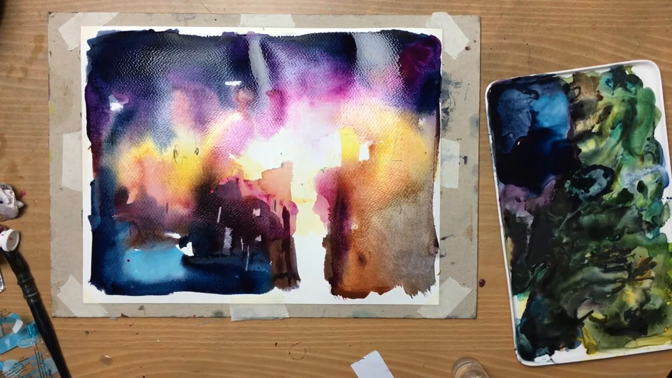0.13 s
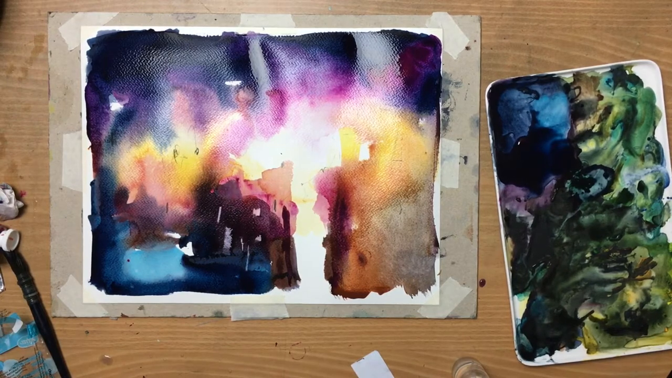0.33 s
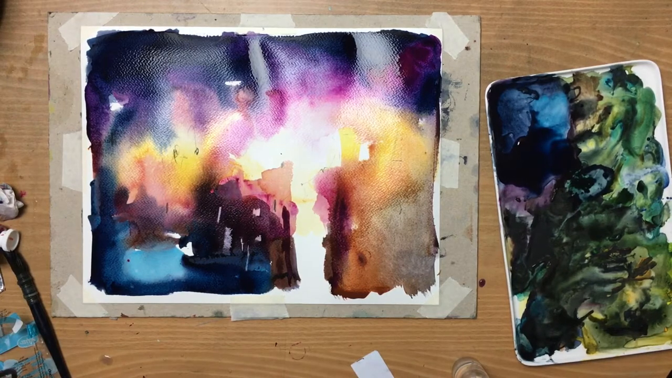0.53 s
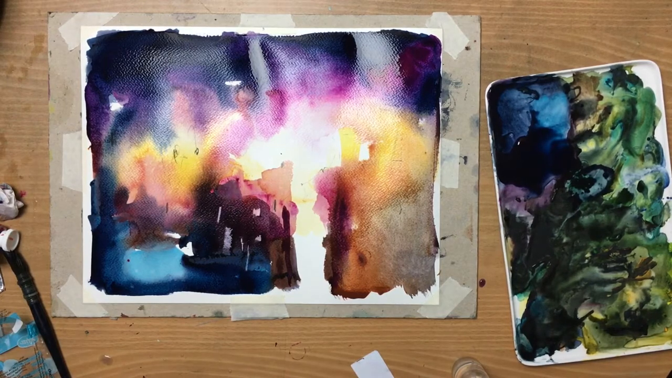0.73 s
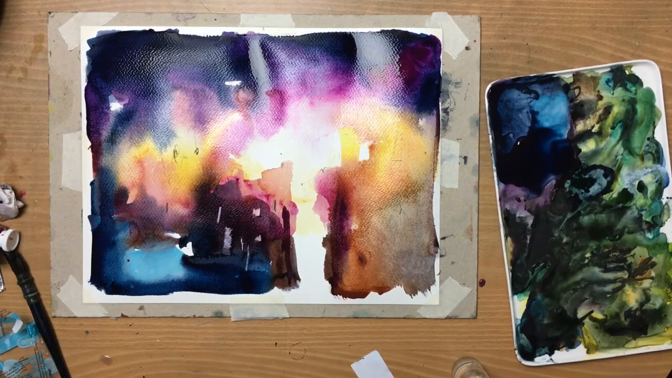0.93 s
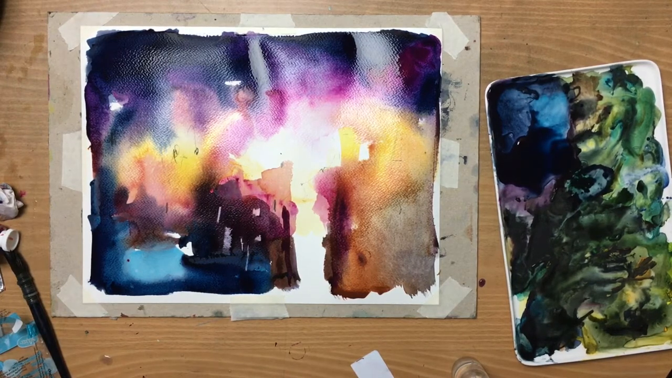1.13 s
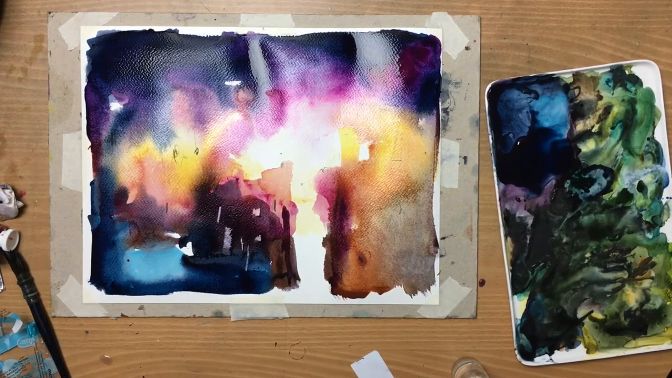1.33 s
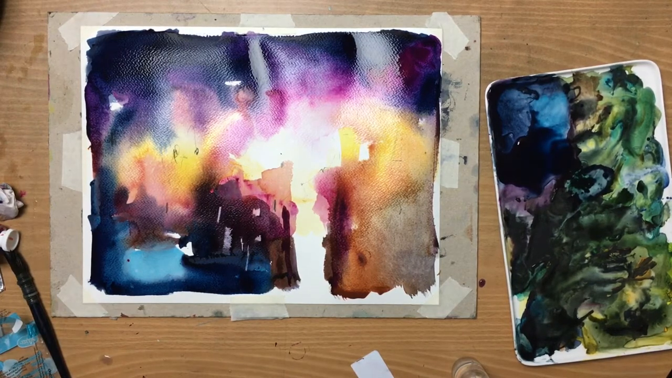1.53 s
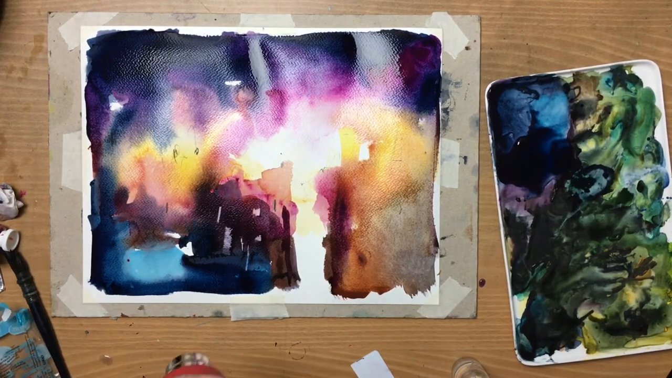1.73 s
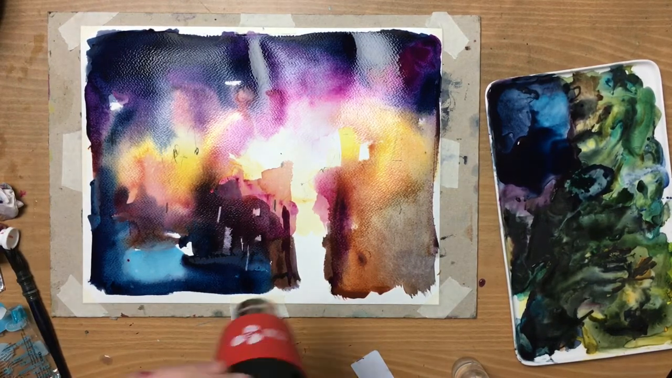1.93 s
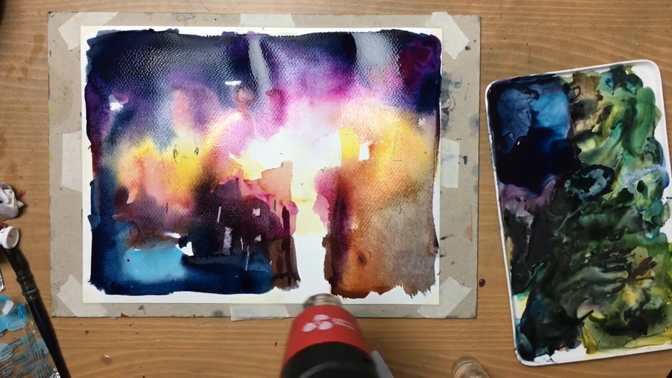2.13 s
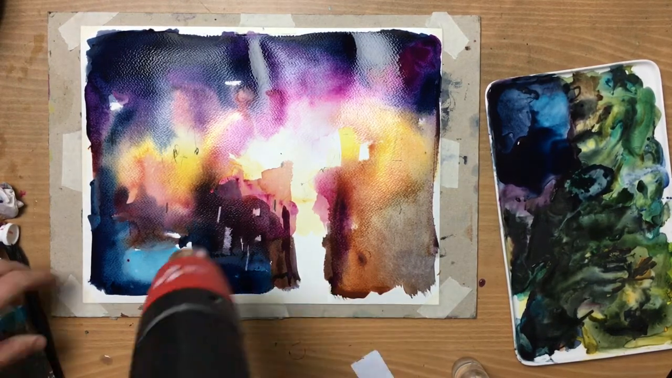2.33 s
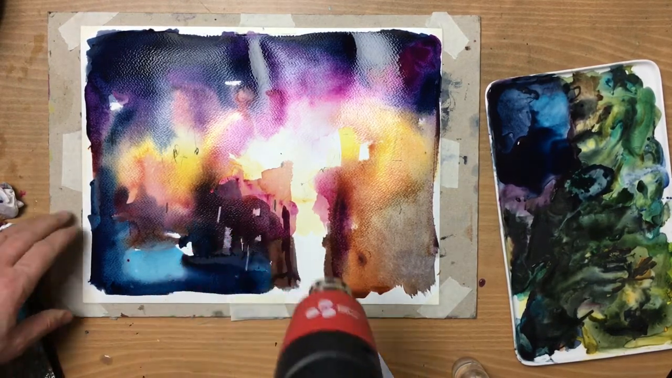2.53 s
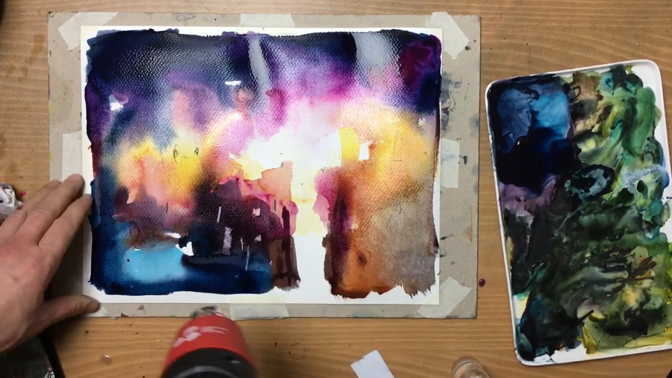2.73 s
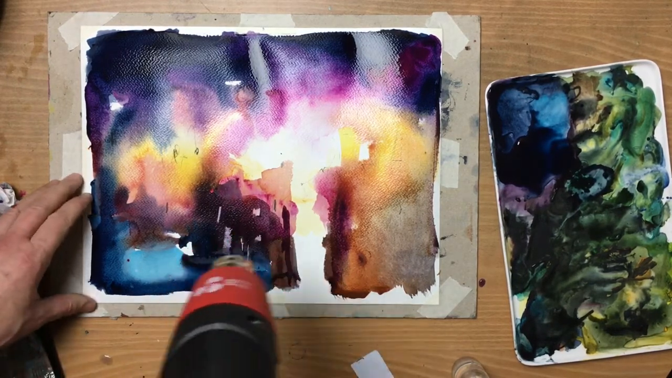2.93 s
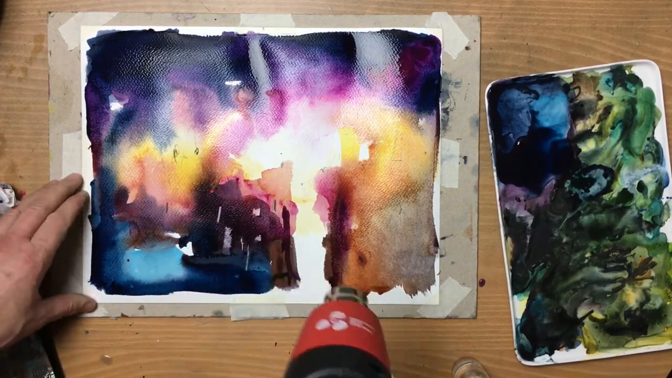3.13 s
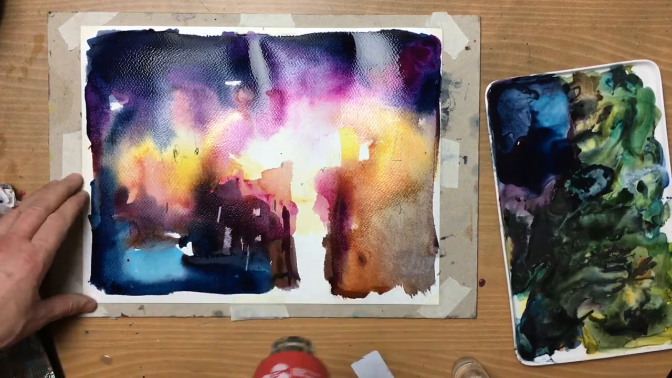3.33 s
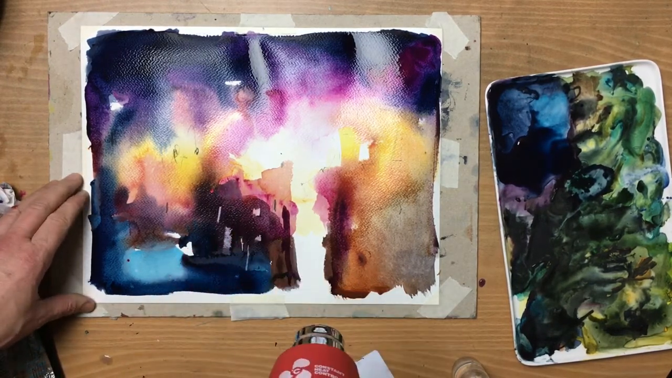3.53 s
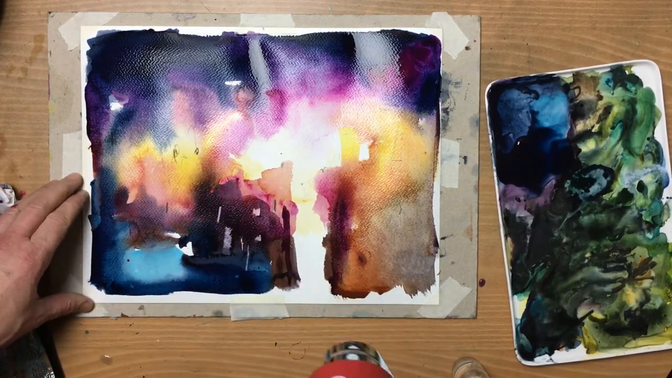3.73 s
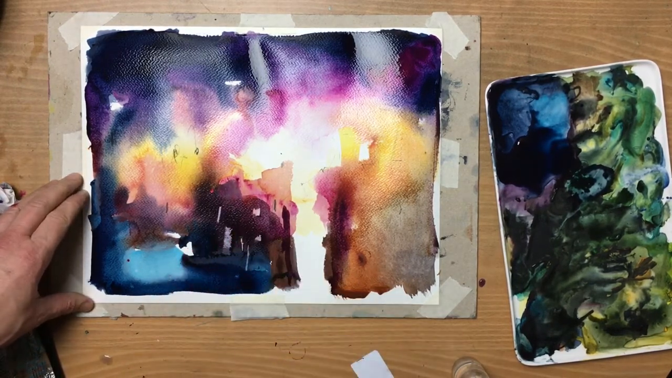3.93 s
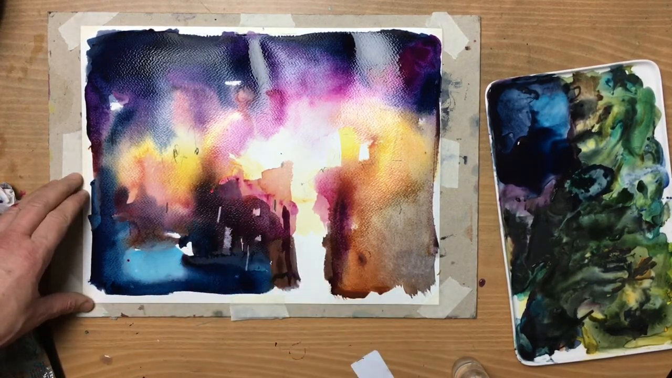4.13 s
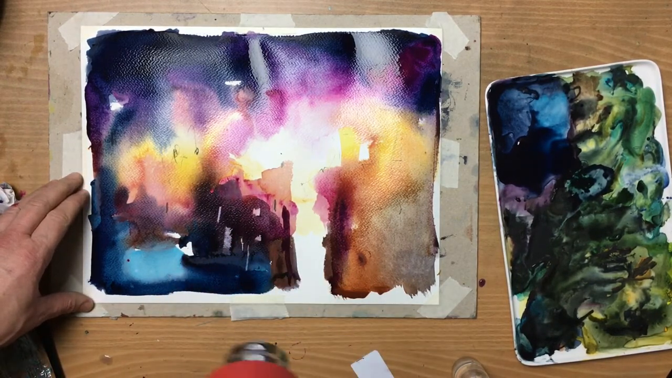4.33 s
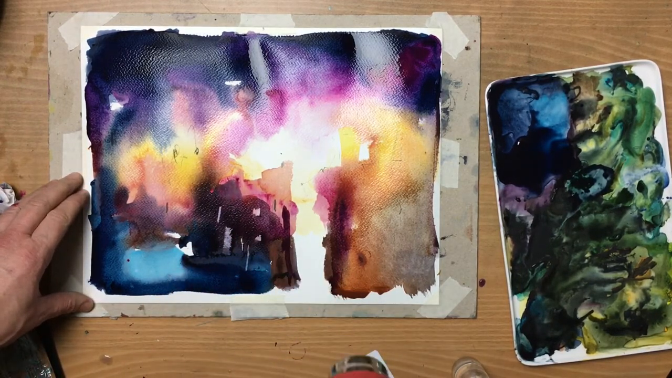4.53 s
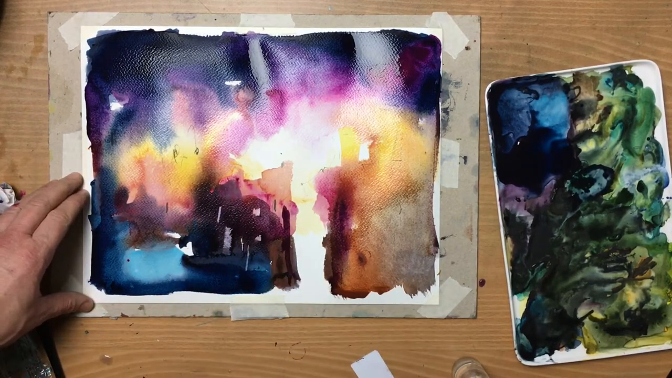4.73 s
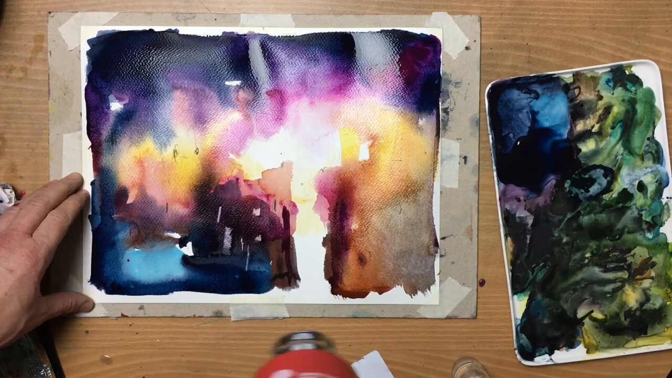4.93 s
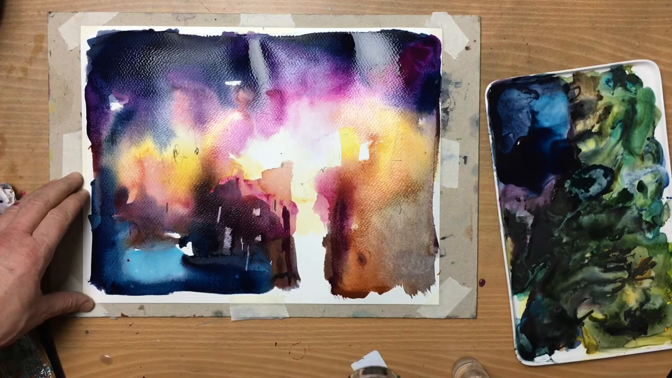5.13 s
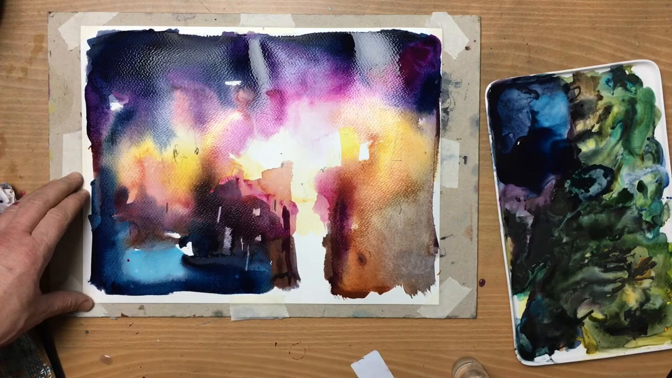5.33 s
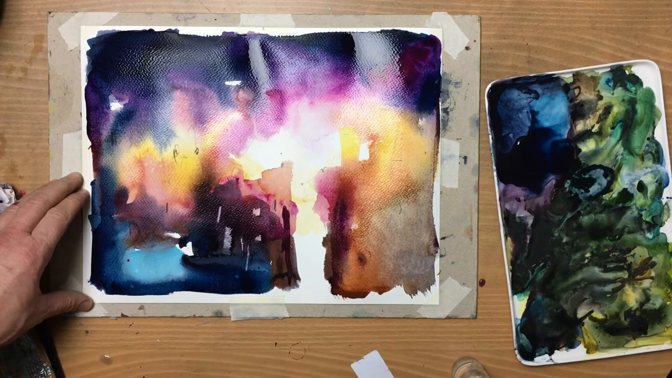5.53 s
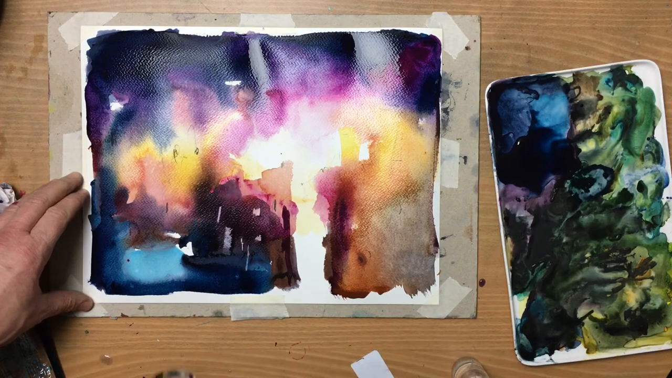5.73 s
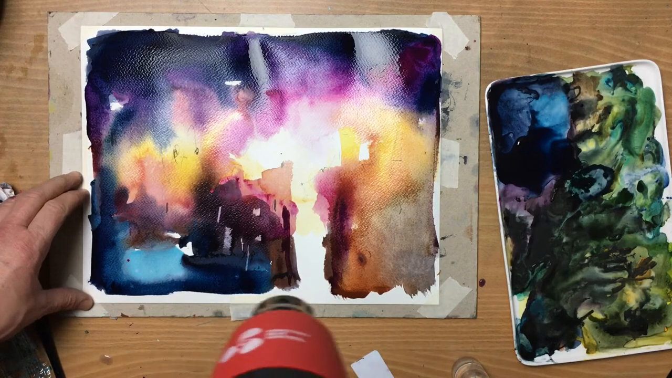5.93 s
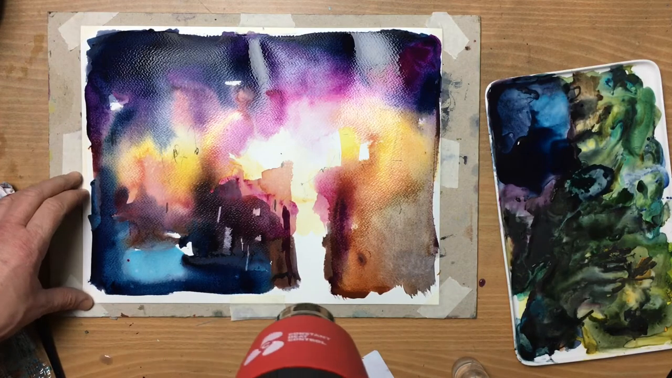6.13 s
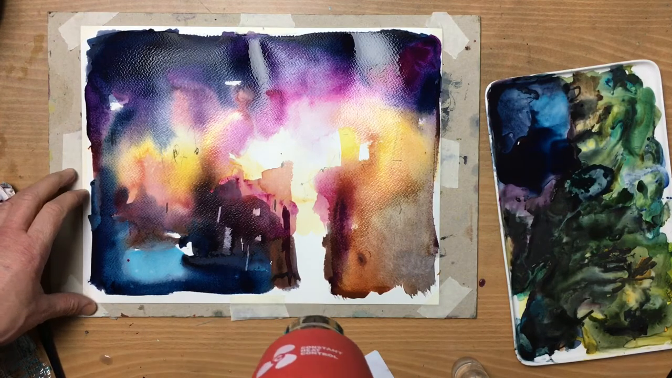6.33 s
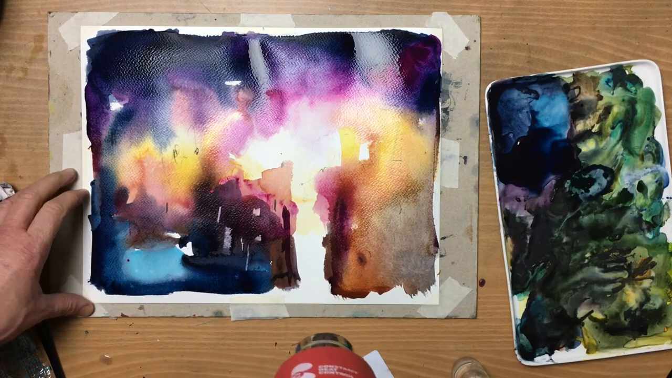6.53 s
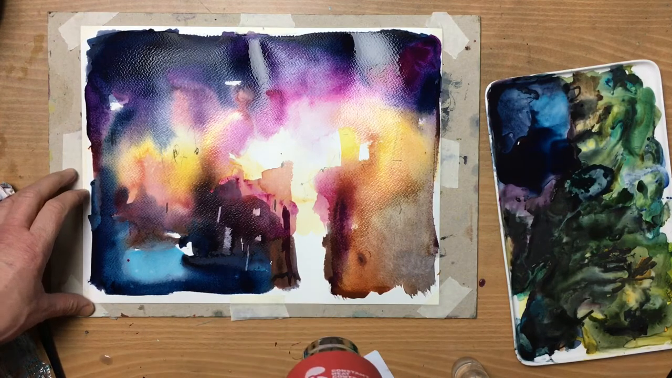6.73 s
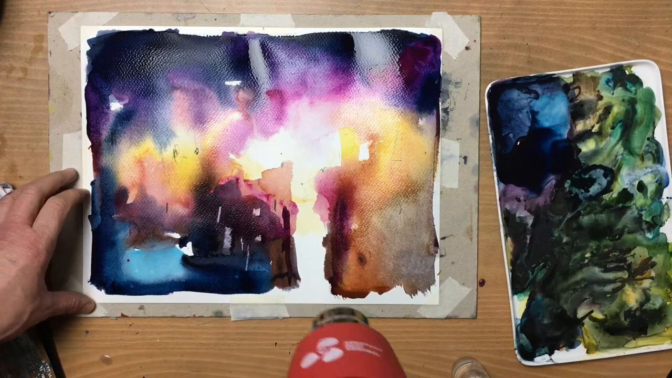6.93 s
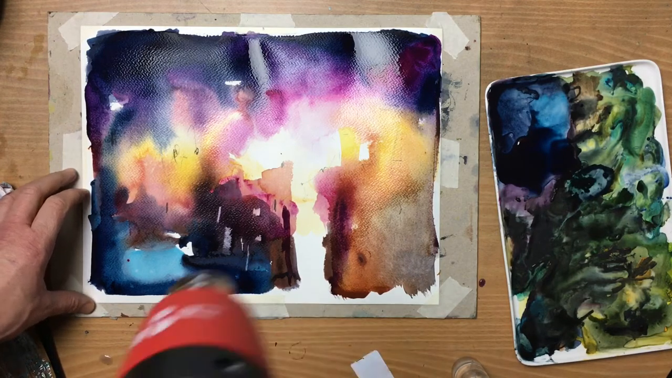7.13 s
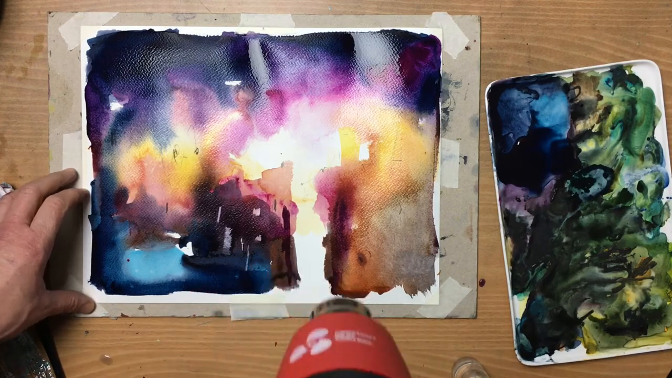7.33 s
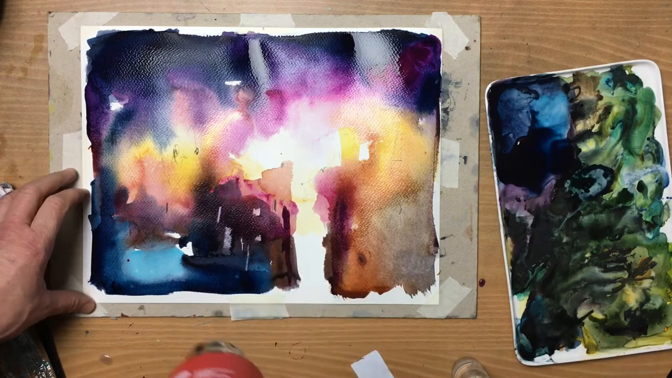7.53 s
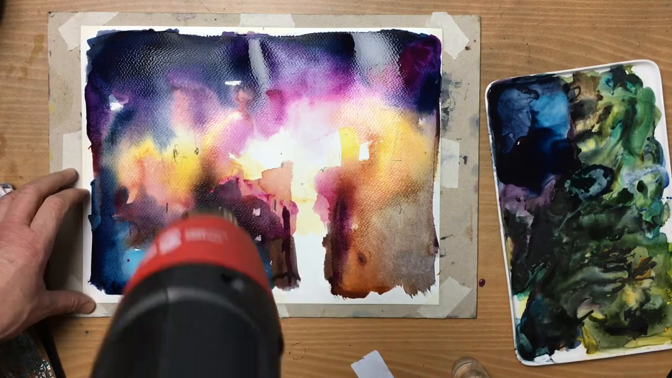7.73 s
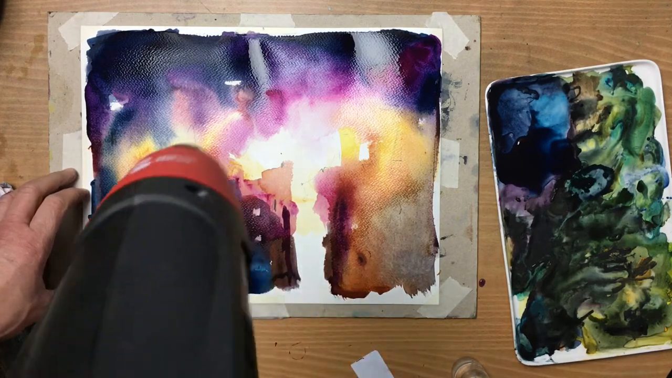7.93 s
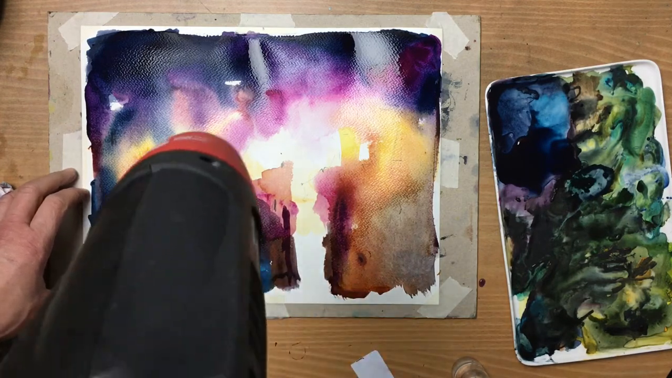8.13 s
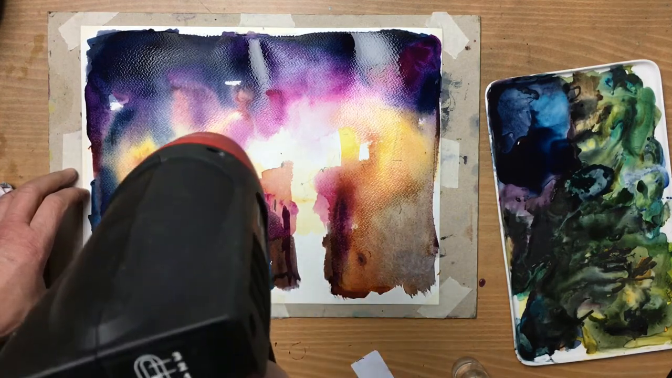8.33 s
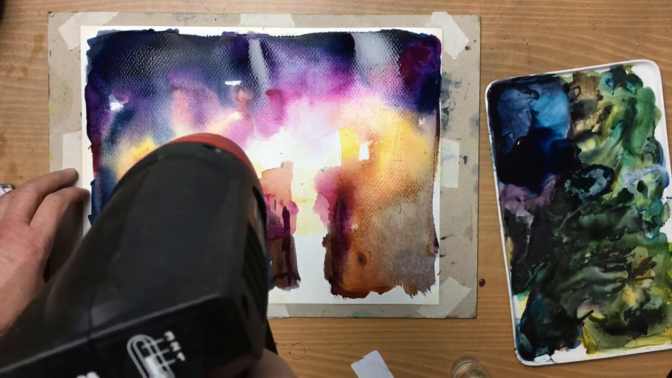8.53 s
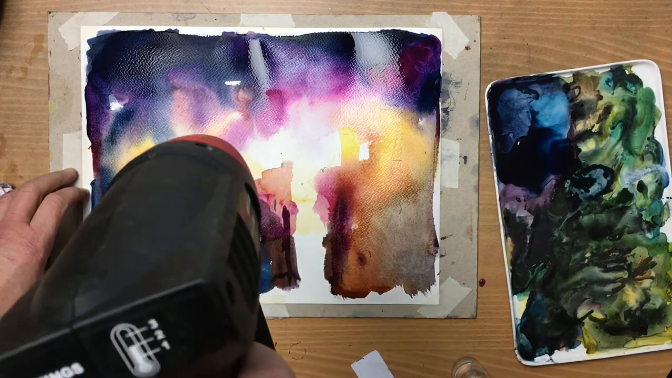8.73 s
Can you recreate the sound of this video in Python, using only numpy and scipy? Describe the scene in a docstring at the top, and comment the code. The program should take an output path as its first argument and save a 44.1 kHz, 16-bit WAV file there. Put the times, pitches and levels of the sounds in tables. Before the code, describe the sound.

Soft knocks and scuffs on a wooden desk, a sharp plastic switch snap, then a hot-air gun whines up into steady, bright rushing air.

```python
"""A hot-air gun is picked up at a wooden desk: knocks ring over clatter, filtered hiss slides, a squeak chirps.
Its plastic switch snaps at about 1.7 s, and the motor spins up: sines whine on multiples of the shaft speed
while the brushes scrape, fizz and buzz. Noise through the resonances of the barrel becomes rushing air, which
changes colour as the hand sweeps it over a watercolour; near 7.5 s the tool is lifted and the hiss brightens.
A faint room noise, hum and hiss lie underneath throughout, close to one microphone."""
import sys
import numpy as np
from scipy import signal
from scipy.fft import rfft, irfft
from scipy.io import wavfile
from scipy.ndimage import map_coordinates

SR = 44100
rng = np.random.default_rng(int(sys.argv[2]) if len(sys.argv) > 2 else 0)


def store_wav(level_fs):
    """Save 16-bit WAV to argv[1]."""
    pcm = np.round(np.clip(np.atleast_2d(level_fs), -1, 1) * 32767)
    wavfile.write(sys.argv[1], SR, pcm.T.astype(np.int16))


N = 391166
T = np.arange(N) / SR

# Resonances the air excites, balanced within each part: f/Hz, width/Hz, level/dB
HOUSING = [(139, 94, -27), (224.4, 22.2, -6), (328, 120, -17), (549, 116, -5), (816, 1500, -14),
           (1315, 307, -2), (1440, 430, -5.5), (1900, 1200, -9)]
BARREL = [(2278, 310, 0), (2575, 670, -6.5)]
GRILLE = [(3510, 770, 1.5), (3900, 590, 6), (4700, 2100, -1), (5860, 950, 1.5), (7425, 900, 2),
          (8540, 1850, -5.5), (10450, 660, -10), (11440, 1940, -8), (13800, 4200, -11.5)]
# Barrel note as the nozzle tilts and nears the paper: t/s, level/dB before a trim, share of usual frequency
BARREL_NOTE = [(1.9, 0.5, 1.06), (2.32, 2.5, 0.91), (2.55, 9, 1), (2.87, 4, 1.03), (3.03, 6.5, 1.04),
               (3.75, 9, 1.003), (4.15, 8.5, 0.96), (5.5, 9, 0.95), (8.3, 8.5, 0.96)]
# Bands of the rush that swell or sink as the nozzle swings: start t/s, length/s, from f/Hz, to f/Hz, level/dB
SWEEPS = [(1.7, 2.2, 760, 770, 5), (2.08, .6, 7900, 8450, 7.5), (2.45, 1.2, 3350, 3400, -6),
          (2.8, 1.25, 2420, 2080, 4), (3.15, .7, 9200, 7600, 5.5), (3.35, .55, 3100, 2400, -9),
          (3.35, .35, 4000, 3500, 4.5), (7.05, .5, 2900, 2850, -6), (7.1, .4, 3450, 3500, 5),
          (7.68, .5, 3700, 3800, 4.5), (7.62, .8, 5000, 5600, 7), (7.76, .45, 8300, 9600, 7.5),
          (7.95, 1.5, 2750, 2750, -4.5), (8.05, 1.3, 13500, 13700, 6.5)]
# Echo lag, set by the tool's height over the desk: t/s, lag/ms
ECHO_LAG = [(2.1, 0.59), (3.2, 0.56), (4.0, 0.73), (4.9, 0.7), (5.7, 0.745), (6.1, 0.79), (6.7, 0.73),
            (7.5, 0.69), (7.82, 0.58), (8.2, 0.53)]
# Echoes off the desk and the things on it: multiple of the desk's lag, share of the direct sound
ECHOES = [(1, .24), (1.5, .15), (2.15, .1)]
# Steady tones at full speed: shaft order, level/dB, change when lifted/dB
STEADY_TONES = [(2, -46.5, -1.5), (3, -47.5, -9), (4, -48, -3), (6, -43.5, 7.5), (9, -50.5, -1),
                (11, -54, 7), (19, -56, 2), (24, -63, 11)]
# Tones on orders 5, 7, 12 and 20 that swell and fade as the tool turns: t/s, level/dB at full speed
FAN_WHINE = [(2.4, -48), (3.15, -43), (4.15, -52), (4.55, -40.5), (5.9, -44.5), (6.9, -39.5), (8.2, -48.5)]
LOW_WHINE = [(1.97, -52), (2.15, -40), (2.7, -35.5), (3.05, -41), (3.4, -51), (3.85, -38.5), (4.15, -42.5),
             (7.4, -42), (8.35, -48), (8.6, -48)]
BLADE_WHINE = [(1.87, -44), (2.15, -38), (2.75, -38), (4.75, -46), (5.05, -37), (5.5, -58), (5.95, -42),
               (6.45, -44), (6.8, -50), (7.2, -47), (7.7, -37.5), (7.9, -37.5), (8.7, -35)]
TOP_WHINE = [(2.4, -57), (3, -51), (3.75, -55), (4.25, -40.5), (4.7, -59), (5.15, -57), (5.4, -52),
             (6.05, -43.5), (6.5, -57), (6.75, -70), (7.15, -50), (7.95, -45), (8.8, -54)]
# Dropouts of orders 7, 12 and 20 as the tool moves through their standing waves: t/s
LOW_DROPOUTS = [2.29, 4.04, 5.83]
BLADE_DROPOUTS = [2.58, 2.96, 3.87, 4.33, 4.84, 5.19, 7.76, 8.04]
TOP_DROPOUTS = [3.15, 3.88, 4.2, 4.56, 5.24, 7.46, 8.15, 8.48]
# Colour of the brushes' treble fizz: f/Hz, level/dB
FIZZ_COLOUR = [(9500, -27), (12800, 0), (15000, -11)]
# The switch is touched, snaps over and bounces: t/s, level/dB, t60/s
CLICKS = [(1.539, -36.5, 0.033), (1.672, -38, 0.008), (1.6907, -16, 0.013), (1.696, -21, 0.012),
          (1.724, -17, 0.014), (1.729, -28, 0.029), (1.740, -22, 0.022), (1.744, -30, 0.018),
          (1.777, -39, 0.032)]
# Colour of the plastic switch, also of the brush scrape: f/Hz, level/dB
PLASTIC_COLOUR = [(650, -36), (1200, -3.5), (4500, -2.5), (6000, 1.5), (10000, -3), (15000, -3.5)]
# Knocks on desk and tool: t/s, level/dB, ring f/Hz, ring t60/s, clatter level/dB against the ring
KNOCKS = [(0.089, -45, 255, 0.067, -20), (.207, -38.5, 650, 0.04, -7), (.217, -44.5, 1323, 0.1, -20),
          (0.218, -45, 2770, 0.066, -25), (0.282, -41.5, 683, 0.072, -4.5), (0.335, -31, 811, 0.078, -14.5),
          (.358, -37.5, 875, 0.09, -6), (0.38, -45, 870, 0.043, -6), (0.467, -43.5, 260, 0.068, -7),
          (.502, -39, 202, 0.13, -16), (.701, -45, 585, 0.091, -6.5), (1.333, -44.5, 550, 0.091, 2),
          (1.366, -55, 890, 0.05, 3.5)]
# Partials of a knock: multiple of its ring frequency, level/dB
RING = [(0.999, 2), (1.1, -18), (2.7, -16)]
# Colour of the knocks' clatter: f/Hz, level/dB
CLATTER_COLOUR = [(30, -35), (130, 7), (600, 3.5), (1300, -1), (3500, -6), (5000, -11.5), (15000, -30)]
# Tool and cord slide over the desk: start t/s, length/s, level/dB before the grain, strongest f/Hz
SLIDES = [(-0.08, 0.24, -57, 3500), (.3, 0.22, -57, 3200), (0.974, 0.25, -60, 2200),
          (1.206, 0.125, -56.5, 11000), (1.641, 0.049, -58, 7000)]
# The arms bump the desk: t/s, level/dB
BUMPS = [(0, -49), (.12, -48.5), (.21, -49), (.36, -48), (.49, -51), (1.47, -58), (1.8, -58.5), (2.39, -57)]
# Colour of the desk rumble: f/Hz, level/dB
RUMBLE_COLOUR = [(45, -51), (90, 8.5), (170, 2), (350, -14), (3000, -91)]
# Colour of the quiet room: f/Hz, level/dB
ROOM_COLOUR = [(48, -41), (95, -2), (130, -9), (350, -16), (650, -11.5), (1500, -14.5), (5000, -20),
               (15000, -48)]

# The motor runs up exponentially once the contacts close, then creeps faster as it warms
ON_S, SHAFT_HZ, RUN_UP_S, CREEP_HZ_PER_S = 1.742, 607.4, 0.322, 1.02
# Growth with speed: gain is the speed share to these powers
RUSH_POWER, BEAM_POWER, TONE_POWER = 1.45, 1.6, 3.9
# The rush starts a little weaker and builds as the tool is brought over the paper
RUSH_DB, APPROACH_DB, APPROACH_END_S = -36, -2, 6
# Lifting the tool raises the hiss around one band and changes the steady tones
LIFT_S, LIFT_LENGTH_S, LIFT_HISS_DB, LIFT_HZ, LIFT_WIDTH_HZ = 7.52, 0.66, 2.5, 6000, 2600
SWEEP_WIDTH_HZ, SWEEP_WIDTH_SHARE = 120, 0.024  # fixed width plus a share of the centre
ECHO_DAMP_HZ = 10100  # rough surfaces take the treble off the echoes
DROPOUT_S = 0.058
SLIDE_BASS_DB, SLIDE_TOP_DB = -9, -10  # skirts of the sliding hiss
SQUEAK_S, SQUEAK_LENGTH_S, SQUEAK_DB = 0.216, 0.022, -49.5
SQUEAK_HZ, SQUEAK_SAG_HZ_PER_S = 3000, 54000
ROOM_DB, HUM_HZ, HUM_DB, HISS_DB = -62.5, 232, -66.5, -68.5
TOP_HZ = 15800


def air(barrel_db, hiss_db, dull_db_per_octave, flutter_db):
    """Turbulence rings housing, barrel and grille, louder and brighter with speed; near echoes comb it."""
    frames = dict(nperseg=2048, noverlap=1536)
    hz, s, eddies = signal.stft(rng.standard_normal(N), SR, **frames)
    hz = hz[:, None] + 1  # keeps clear of 0 Hz
    approach_db = APPROACH_DB * (1 - ramp(s, ON_S, APPROACH_END_S - ON_S))
    rush = undb(RUSH_DB + approach_db) * speed(s) ** RUSH_POWER

    note_db, tuning = read(BARREL_NOTE, s)
    barrel_modes = [(f * tuning, width, db) for f, width, db in BARREL]
    lift_db = LIFT_HISS_DB * ramp(s, LIFT_S, LIFT_LENGTH_S) * resonance(hz, LIFT_HZ, LIFT_WIDTH_HZ)
    dull_db = dull_db_per_octave * (1 - speed(s)) * np.log2(hz / 4000)
    grille_db = hiss_db + lift_db - dull_db
    parts = [(HOUSING, 0), (barrel_modes, note_db + barrel_db), (GRILLE, grille_db)]
    power = 0
    for modes, part_db in parts:
        shape = sum(undb(db) ** 2 * resonance(hz, f, width) for f, width, db in modes)
        power = power + shape / shape.mean() * undb(part_db) ** 2

    lag_s = read(ECHO_LAG, s)[0] / 1000
    echoes = sum(share * np.exp(-2j * np.pi * hz * lag_s * multiple) for multiple, share in ECHOES)
    comb = np.abs(1 + echoes / (1 + (hz / ECHO_DAMP_HZ) ** 2))
    coloured = eddies * rush * np.sqrt(power) * comb * undb(sweeps(hz, s))
    stream = signal.istft(coloured, SR, **frames)[1][:N]
    return stream * undb(flutter_db * walk(24, T))


def sweeps(hz, s):
    """Gain in dB of the narrow bands that swell or sink while they glide."""
    out = 0
    for start, length, from_hz, to_hz, db in SWEEPS:
        along = ramp(s, start, length)
        centre = from_hz + (to_hz - from_hz) * along
        width = SWEEP_WIDTH_HZ + SWEEP_WIDTH_SHARE * centre
        out = out + db * np.sin(np.pi * along) * np.exp(-((hz - centre) / width) ** 2)
    return out


def treble_ripple(x, share=0.16, drift_ms=0.088, above_hz=2200, count=6):
    """Randomly drifting short delays, mixed in above a highpass, give the rush a fine, wandering ripple."""
    highpass = signal.butter(2, above_hz, "high", fs=SR, output="sos")
    treble = signal.sosfilt(highpass, x)
    out = x
    for delay_ms in rng.uniform(1.2, 7, count):
        delay = (delay_ms + drift_ms * walk(1.5, T)) * SR / 1000  # in samples
        out = out + share * map_coordinates(treble, [np.arange(N) - delay], order=3)
    return out


def motor(jitter):
    """The slightly unsteady shaft drives both the whine and the brushes."""
    shaft_hz = SHAFT_HZ * speed(T) * (1 + jitter * walk(25.0, T))
    angle = 2 * np.pi * np.cumsum(shaft_hz) / SR
    tones = whine(angle, waver_db=2, beam_waver_db=1.63, shimmer=0.15, cut_on_hz=1136)
    scraping = scrape(angle, scrape_db=-50.5, strand_db=-50.5, start_s=1.872, t60=1.5)
    buzzing = buzz(angle, buzz_db=-41, centre_hz=12800, width_hz=5200, t60=6.0, fizz_db=-2.5)
    return tones + scraping + buzzing


def speed(times):
    """The motor's speed as a share of its run-up speed, which the slow creep then passes."""
    age = np.maximum(times - ON_S, 0)
    return (1 - np.exp(-age / RUN_UP_S)) * (1 + CREEP_HZ_PER_S * age / SHAFT_HZ)


def whine(angle, waver_db, beam_waver_db, shimmer, cut_on_hz):
    """Blades and commutator sing on shaft orders; each tone shimmers and escapes only above the cut-on."""
    lifted, spin = ramp(T, LIFT_S, LIFT_LENGTH_S), speed(T)
    beams = [(5, FAN_WHINE, []), (7, LOW_WHINE, LOW_DROPOUTS),
             (12, BLADE_WHINE, BLADE_DROPOUTS), (20, TOP_WHINE, TOP_DROPOUTS)]
    tones = []
    for order, curve, gaps in beams:
        level_db = read(curve, T)[0] + beam_waver_db * walk(13.0, T)
        tones.append((order, undb(level_db) * dropouts(gaps) * spin ** BEAM_POWER))
    for order, db, lift_db in STEADY_TONES:
        level_db = db + lift_db * lifted + waver_db * walk(7.9, T)
        tones.append((order, undb(level_db) * spin ** TONE_POWER))
    out = 0
    for order, gain in tones:
        escapes = ramp(order * SHAFT_HZ * spin, cut_on_hz, cut_on_hz / 20)
        tone = np.sin(order * angle + rng.uniform(0, 2 * np.pi))
        out = out + gain * escapes * (1 + shimmer * walk(34, T)) * tone
    return np.sqrt(2) * out  # tone levels are rms


def dropouts(times):
    """Gain of a tone that its own echo briefly cancels at the given times."""
    return 1 - sum(np.exp(-((T - s) / DROPOUT_S) ** 2) for s in times)


def scrape(angle, scrape_db, strand_db, start_s, t60):
    """Under the starting current the brushes scrape and sing on even shaft orders, then settle."""
    strands = sum(np.sin(order * angle + walk(45, T) / 2) for order in range(8, 20, 2))
    mix = undb(scrape_db) * noise(PLASTIC_COLOUR) + undb(strand_db) * strands
    return mix * fade(np.maximum(T - start_s, 0), t60, rise=0.0098)


def buzz(angle, buzz_db, centre_hz, width_hz, t60, fizz_db):
    """The brushes buzz in rough, flickering high orders through a treble resonance, with noisy fizz."""
    spin = speed(T)
    shaft_hz = SHAFT_HZ * spin + 1
    tones = 0
    for order in range(21, 35):
        gain = np.abs(walk(9, T)) * resonance(order * shaft_hz, centre_hz, width_hz)
        tones = tones + gain * np.sin(order * angle + walk(45, T))
    mix = tones * spin ** 2 + undb(fizz_db) * noise(FIZZ_COLOUR)
    return undb(buzz_db) * mix * fade(np.maximum(T - ON_S, 0), t60, rise=0.66)


def switch():
    """Bright, quickly damped cracks of the plastic rocker."""
    blows, age = np.zeros(N), T[:SR // 10]
    for s, db, t60 in CLICKS:
        add(blows, s, undb(db) * fade(age, t60, rise=0.00071))
    return blows * noise(PLASTIC_COLOUR)


def knocks():
    """Each knock rings a few decaying partials over a short clatter."""
    out, age, clatter = np.zeros(N), T[:SR // 2], noise(CLATTER_COLOUR)
    for s, db, hz, t60, clatter_db in KNOCKS:
        partials = sum(undb(part_db) * np.sin(2 * np.pi * hz * ratio * age) for ratio, part_db in RING)
        ring = partials * fade(age, t60, rise=0.0018)
        grains = np.roll(clatter, rng.integers(N))[:len(age)]
        rattle = grains * fade(age, t60=0.14, rise=0.00039)
        add(out, s, undb(db) * (ring + undb(clatter_db) * rattle))
    return out


def slides(grain_db):
    """Things dragged over the desk hiss in grainy swells of coloured noise."""
    out = 0
    for s, length, db, hz in SLIDES:
        hiss = noise([(hz / 10, SLIDE_BASS_DB), (hz, 0), (TOP_HZ, SLIDE_TOP_DB)])
        out = out + undb(db) * np.sin(np.pi * ramp(T, s, length)) * hiss
    return out * undb(grain_db * walk(210, T))


def squeak():
    """The slipping grip gives a brief chirp that sinks in pitch."""
    along = ramp(T, SQUEAK_S, SQUEAK_LENGTH_S)
    hz = SQUEAK_HZ - SQUEAK_SAG_HZ_PER_S * SQUEAK_LENGTH_S * along
    return undb(SQUEAK_DB) * np.sin(np.pi * along) * np.sin(2 * np.pi * np.cumsum(hz) / SR)


def bumps(t60):
    """Bumps of the arms set the desk rumbling in low, decaying noise."""
    swell = sum(undb(db) * fade(np.maximum(T - s, 0), t60, rise=0.011) for s, db in BUMPS)
    return swell * noise(RUMBLE_COLOUR)


def in_room(x, wet_db, t60):
    """A small furnished room adds a short diffuse tail."""
    age = T[:SR // 2]
    tail = rng.standard_normal(len(age)) * fade(age, t60, rise=0.0065)
    return x + undb(wet_db) * signal.fftconvolve(x, tail / np.linalg.norm(tail))[:N]


def background():
    """Coloured room noise, a steady hum and white hiss."""
    hum = undb(HUM_DB) * np.sin(2 * np.pi * HUM_HZ * T)
    return undb(ROOM_DB) * noise(ROOM_COLOUR) + hum + undb(HISS_DB) * rng.standard_normal(N)


def undb(db):
    """Decibels to gain."""
    return 10 ** (np.asarray(db) / 20)


def unit(x):
    """Scale to rms 1."""
    return x / np.sqrt(np.mean(x ** 2))


def read(table, times):
    """The columns of a curve at the given times."""
    s, *columns = np.transpose(table)
    return [np.interp(times, s, column) for column in columns]


def ramp(times, start, length):
    """A straight rise from 0 to 1."""
    return np.clip((times - start) / length, 0, 1)


def walk(rate, times):
    """Smooth chance with a spread of 1, changing about rate times a second."""
    hz = np.arange(N // 2 + 1) * SR / N
    lowpass = np.exp(-np.minimum(hz / rate, 20) ** 2)
    slow = irfft(rfft(rng.standard_normal(N)) * lowpass, N)
    return np.interp(times, T, unit(slow))


def noise(colour):
    """Noise of rms 1 with a spectrum of (f/Hz, level/dB) points."""
    hz, db = np.transpose(colour)
    bins = np.arange(N // 2 + 1) * SR / N
    gain = undb(np.interp(np.log(bins + 1), np.log(hz), db))
    return unit(irfft(rfft(rng.standard_normal(N)) * gain, N))


def resonance(hz, centre, width):
    """Power response of a steep resonance."""
    return 1 / (1 + ((hz ** 2 - centre ** 2) / (hz * width)) ** 2) ** 2


def fade(age, t60, rise):
    """Envelope of a blow: a quick rise, then an exponential decay."""
    return (1 - np.exp(-age / rise)) * np.exp(-np.log(1000) * age / t60)


def add(track, s, sound):
    """Mix a sound into the track at time s."""
    start = max(int(s * SR), 0)
    track[start:start + len(sound)] += sound[:N - start]


def scene():
    """Blower, switch and handling over the background; both channels carry the same sound."""
    rush = air(barrel_db=-2.0, hiss_db=2.5, dull_db_per_octave=8.5, flutter_db=0.5)
    blower = treble_ripple(rush) + motor(jitter=0.00033)
    handling = knocks() + slides(grain_db=3) + squeak() + bumps(t60=0.54)
    near = in_room(switch() + handling, wet_db=-11.5, t60=0.14)
    return np.tile(blower + near + background(), (2, 1))


def record(dry):
    """A steep elliptic low-pass cuts the top."""
    lowpass = signal.ellip(10, 0.2, 80, TOP_HZ, fs=SR, output="sos")
    return signal.sosfilt(lowpass, dry)


dry = scene()
out = record(dry)
store_wav(out)
```